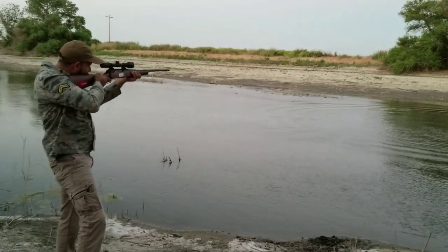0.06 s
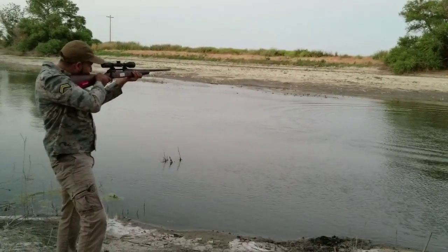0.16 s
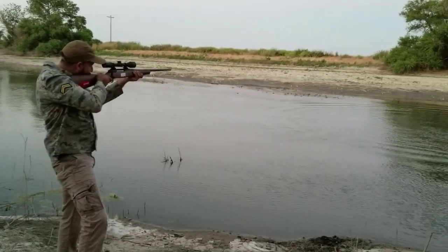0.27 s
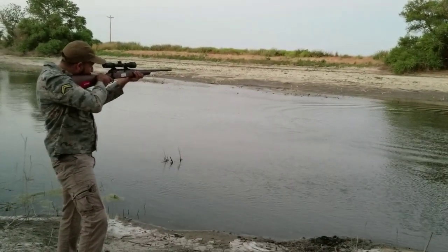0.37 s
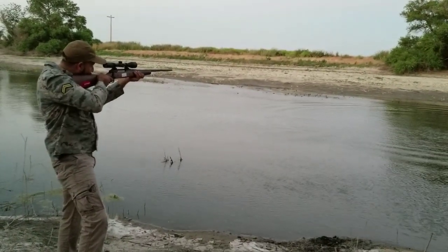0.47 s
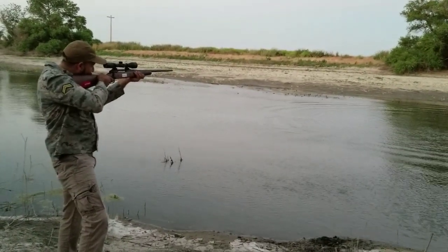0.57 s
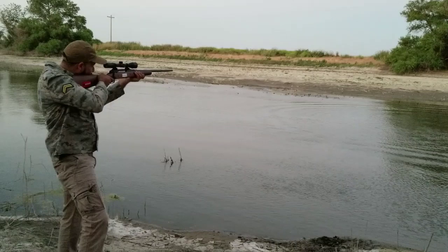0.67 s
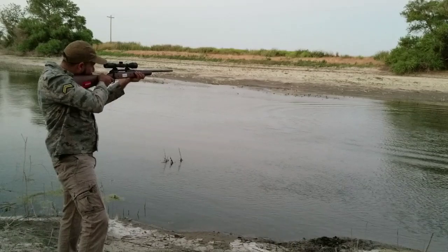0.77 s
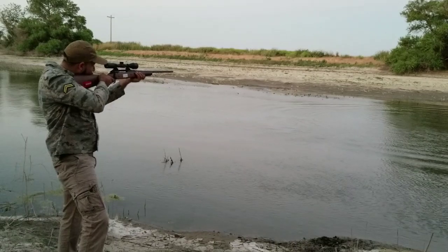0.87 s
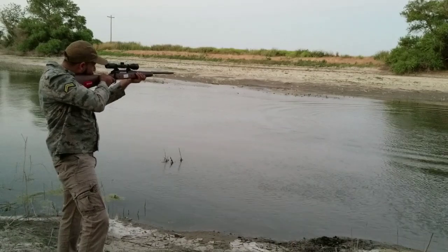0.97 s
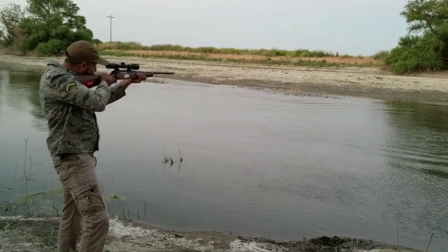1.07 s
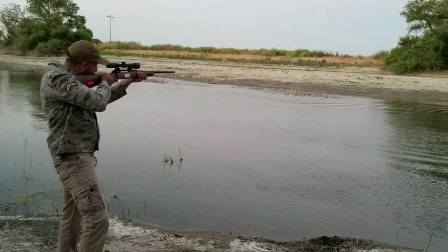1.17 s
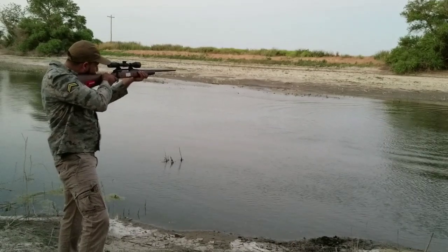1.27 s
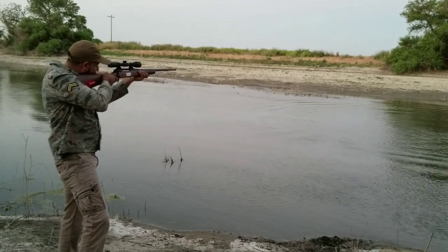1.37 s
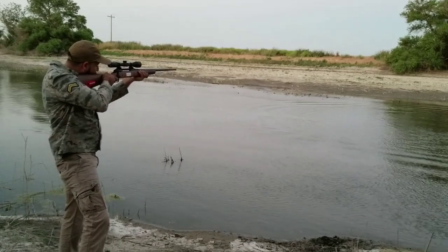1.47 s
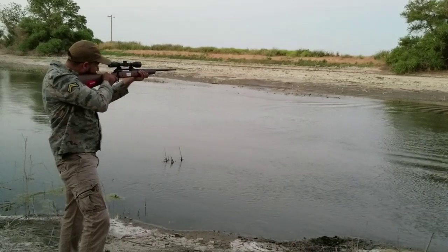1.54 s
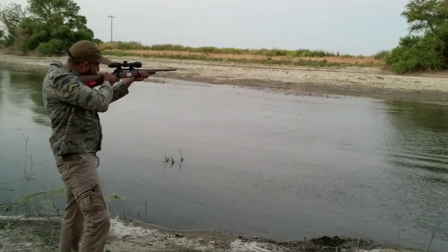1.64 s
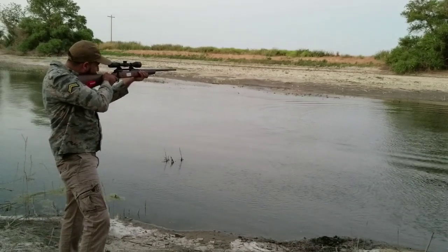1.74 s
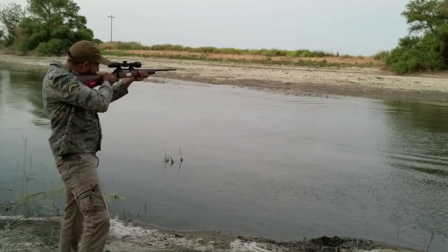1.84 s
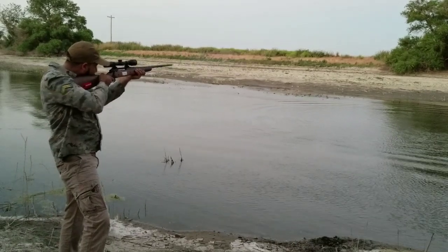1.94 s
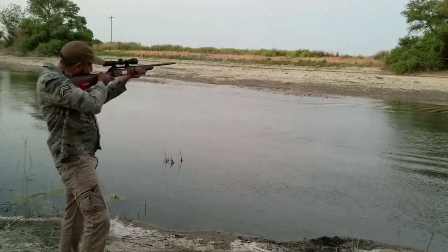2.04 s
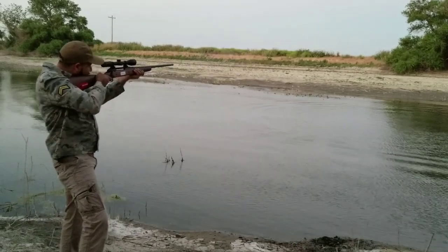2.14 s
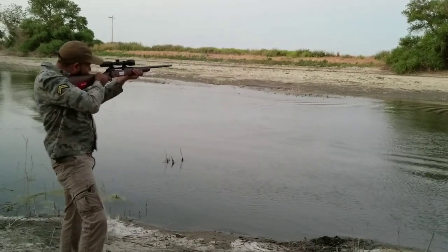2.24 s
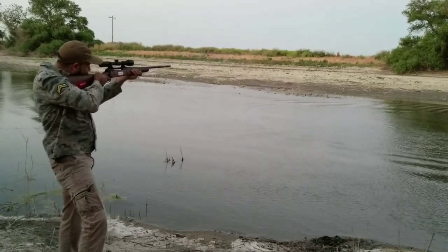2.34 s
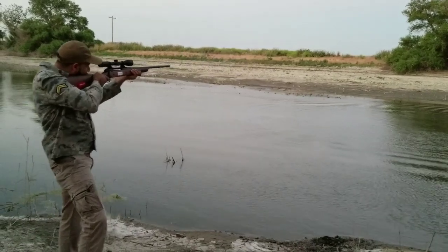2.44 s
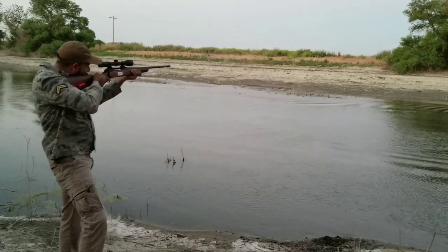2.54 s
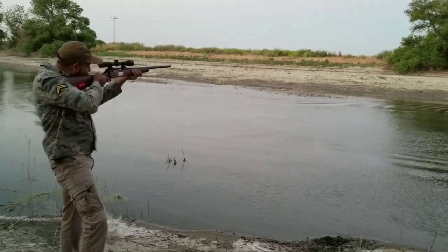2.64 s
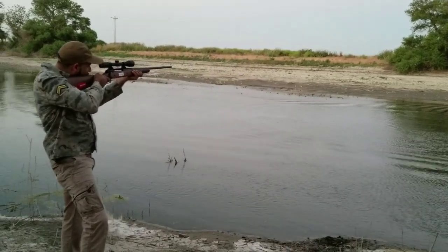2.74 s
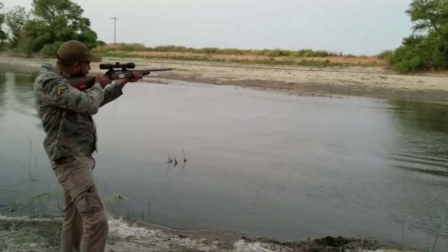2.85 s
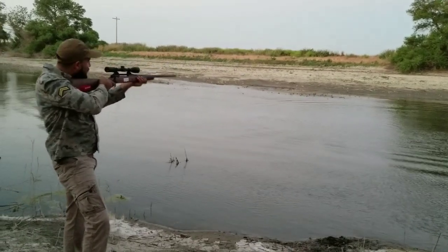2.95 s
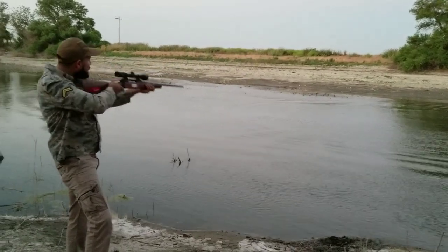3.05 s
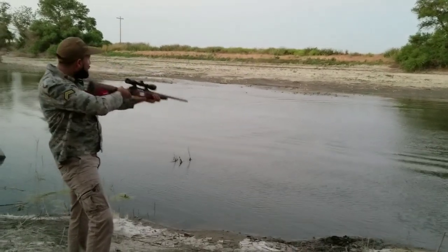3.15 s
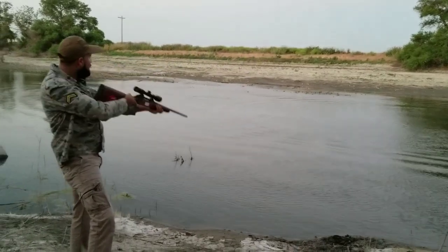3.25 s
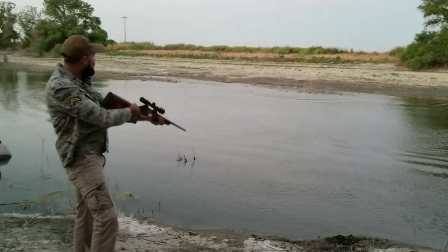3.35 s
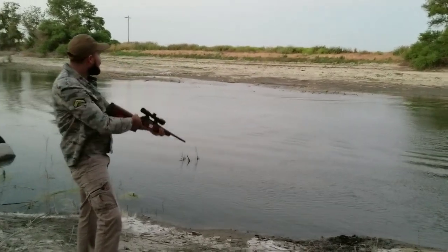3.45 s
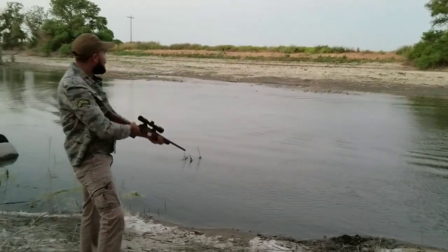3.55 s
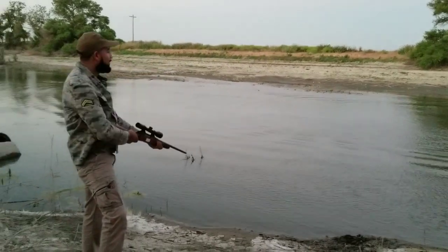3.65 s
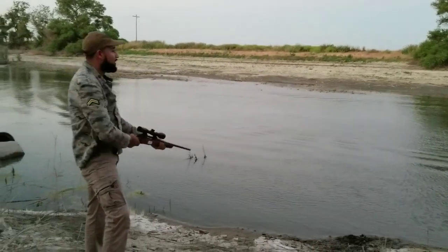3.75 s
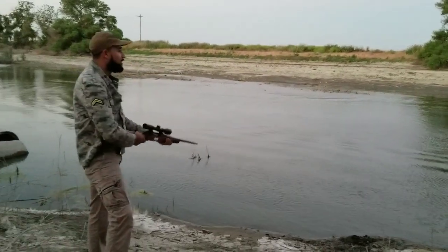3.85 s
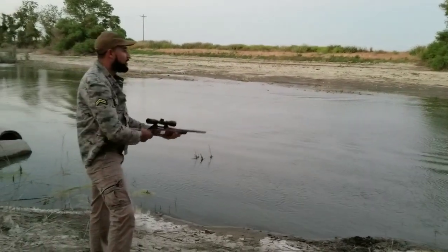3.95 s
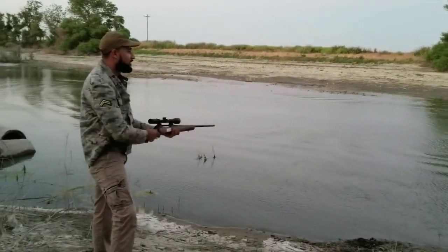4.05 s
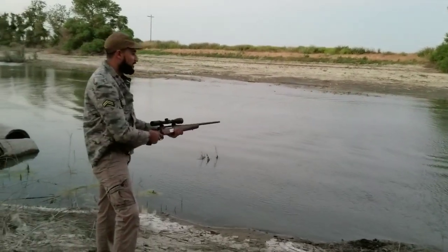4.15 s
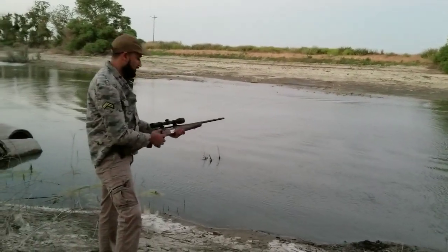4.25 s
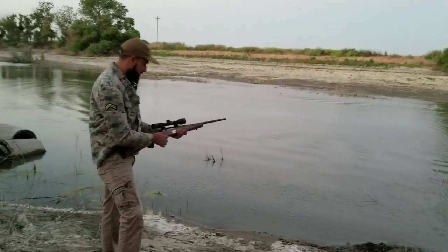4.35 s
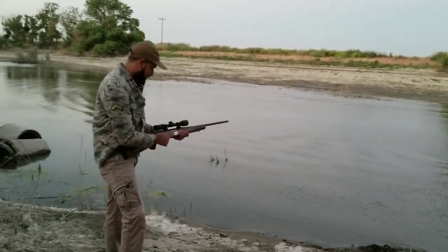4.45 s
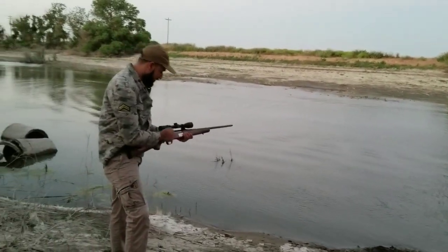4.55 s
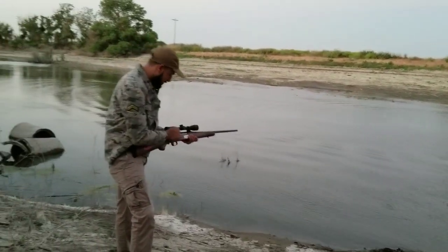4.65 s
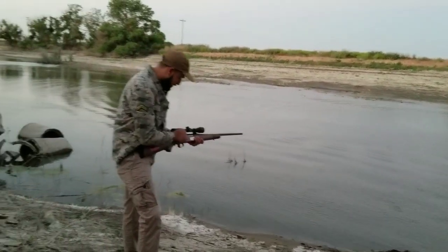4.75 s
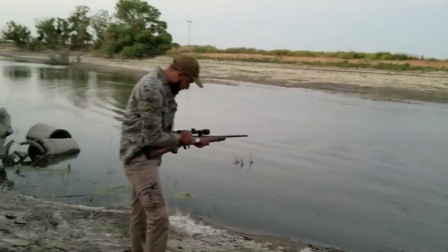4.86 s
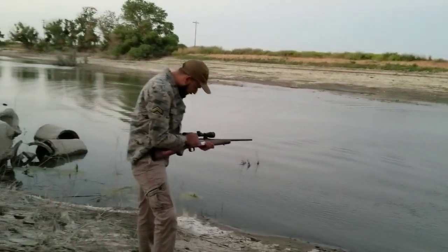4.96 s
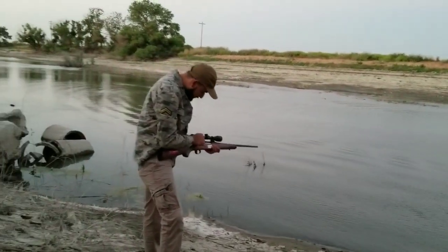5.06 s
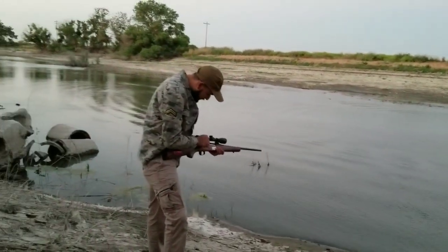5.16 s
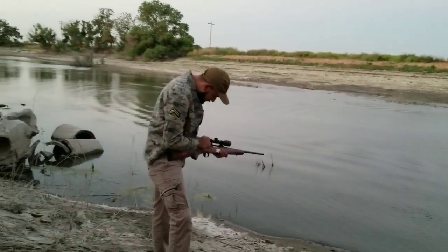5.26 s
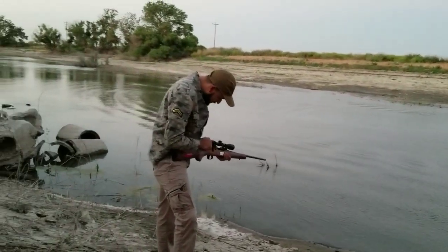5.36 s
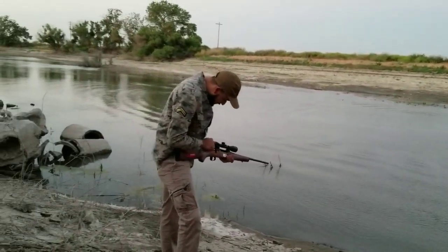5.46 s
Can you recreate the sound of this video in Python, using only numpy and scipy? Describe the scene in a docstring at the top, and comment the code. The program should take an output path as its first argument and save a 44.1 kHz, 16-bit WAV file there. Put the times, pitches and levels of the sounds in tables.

```python
"""A river bank with a camera of two microphone ports: rumble, a far roar, a faint hum and hiss, shaped noise and a tone.
Now and then a small bird chips far off, a short falling tone broken up by leaves and air.
At 2.3 s a small-bore rifle is fired across the river, a few metres away: a pressure pulse, then noise
scattered back by banks, reeds and far tree lines, duller the longer its path; the gain ducks and recovers.
From 4.6 s the bolt is worked: each contact rings the modes of receiver and stock."""
import sys
import numpy as np
from scipy import signal
from scipy.fft import rfft, irfft, next_fast_len
from scipy.io import wavfile
from scipy.ndimage import uniform_filter1d, map_coordinates

SR = 44100
rng = np.random.default_rng(int(sys.argv[2]) if len(sys.argv) > 2 else 0)


def volts_from_db(level):
    """Convert decibel levels to linear amplitude ratios."""
    exponent = np.asarray(level, float) / 20
    return 10 ** exponent


def output_pcm(signal):
    """Save a mono or channel-first signal as 16-bit PCM at the path in sys.argv[1].

    Samples are clipped to [-1, 1] before scaling.
    """
    pcm = np.clip(np.atleast_2d(signal).T, -1, 1) * 32767
    wavfile.write(sys.argv[1], SR, np.round(pcm).astype(np.int16))


N = 243323
T = np.arange(N) / SR  # s


def unit(x):
    """Scaled to rms 1."""
    return x / np.sqrt(np.mean(x ** 2) + 1e-20)


def along(points, hz):
    """Values at hz, from (f/Hz, value) points on a log axis."""
    f, value = np.transpose(points)
    return np.interp(np.log(hz + 1), np.log(f + 1), value)


def curves(rows):
    """One value per sample for each column after the time."""
    s, *columns = np.transpose(rows)
    return [np.interp(T, s, column) for column in columns]


def wobble(rate):
    """A smooth random curve, rate knots a second."""
    knots = rng.standard_normal(int(N * rate / SR) + 4)
    return map_coordinates(knots, [T * rate])


def filtered(x, response):
    """x times a complex response of frequency."""
    n = x.shape[-1]
    m = next_fast_len(n + 4096)
    spectrum = rfft(x, m) * response(np.fft.rfftfreq(m, 1 / SR))
    return irfft(spectrum, m)[..., :n]


# how alike the two microphone ports hear a sound: f/Hz, likeness (0 to 1)
PORT_LIKENESS = [(60, 0.89), (200, 0.99), (500, 0.97), (1000, 0.44), (3000, 0.33), (12000, .4)]


def ports(spectrum, lag_ms, n=N, alike=PORT_LIKENESS):
    """Noise of rms 1 at the two ports: partly shared, the left hearing it lag_ms later."""
    def mid_and_side(hz):
        turn = np.arccos(np.clip(along(alike, hz), 0, 1)) / 2
        return volts_from_db(along(spectrum, hz)) * np.array([np.cos(turn), np.sin(turn)])

    def lag(hz):
        return np.exp(-1j * np.pi * hz * np.array([[lag_ms], [-lag_ms]]) / 1000)

    mid, side = filtered(rng.standard_normal((2, n)), mid_and_side)
    pair = np.array([mid + side, mid - side])
    return unit(filtered(pair, lag))


# levels of the open air: t/s, rumble level/dB, far roar level/dB
AIR_LEVELS = [(0, -70, -73), (.4, -69.5, -71.5), (1.2, -67, -70), (1.9, -67, -71), (2.3, -68, -72.5),
              (3.4, -70.5, -71), (4, -67.5, -74.5), (4.7, -69.5, -68), (5.52, -65, -71.5)]
# spectrum of the far rumble: f/Hz, level/dB per Hz
RUMBLE_SPECTRUM = [(12, -33), (20, -13), (81, 5.5), (107, 2), (166, -5), (188, -19.5), (223, -34),
                   (250, -13), (320, -26), (550, -120)]
# spectrum of the far roar: f/Hz, level/dB per Hz
ROAR_SPECTRUM = [(120, -32.5), (200, -2.5), (224, -11), (315, 0), (432, -4), (779, -0.5), (1120, -9),
                 (3000, -17.5), (3900, -49), (6600, -120)]
# level of the hum before it wavers: t/s, level/dB
HUM_LEVELS = [(0, -76.5), (.6, -68), (.8, -82.5), (1.4, -75.5), (3, -90), (5.52, -67.5)]
HUM_HZ = 158
# spectrum of the hiss of each port: f/Hz, level/dB per Hz
HISS_SPECTRUM = [(880, 1.5), (1500, 2.5), (1950, 2), (2140, -4), (4860, -5.5), (5350, -6), (14000, -8.5),
                 (15000, -22.5)]
HISS_DB = -74


def background():
    """Far noise reaches both ports: lumpy rumble and a roar, with a wavering hum and each port's hiss."""
    rumble_db, roar_db = curves(AIR_LEVELS)
    hum_db, = curves(HUM_LEVELS)
    rumble = volts_from_db(rumble_db + 1.5 * wobble(2.6)) * ports(RUMBLE_SPECTRUM, lag_ms=-0.28)
    roar_flutter_db = 0.8 * wobble(27) + 0.7 * wobble(28)
    roar = volts_from_db(roar_db + roar_flutter_db) * ports(ROAR_SPECTRUM, lag_ms=-0.27)
    hum_turns = np.cumsum(HUM_HZ + 1.3 * wobble(9.1)) / SR
    hum = volts_from_db(hum_db + 2.5 * wobble(12)) * np.sin(2 * np.pi * hum_turns)
    hiss_db = HISS_DB + 0.33 * wobble(1.0)
    hiss = volts_from_db(hiss_db) * ports(HISS_SPECTRUM, lag_ms=0, alike=[(1000, 0.064)])
    return rumble + roar + hum + hiss


# chips of the far bird, level before the blur: t/s, length/s, level/dB
CHIRPS = [(1.102, 0.053, -73), (2.265, .035, -74), (4.286, 0.0396, -71.5), (5.185, 0.032, -79)]
CHIRP_START_HZ, CHIRP_END_HZ = 5770, 5270


def birds():
    """Short falling chips, far off, blurred by leaves and air differently at each port."""
    out = np.zeros(N)
    for s, length, db in CHIRPS:
        u = np.clip((T - s) / length, 0, 1)
        pitch_hz = CHIRP_END_HZ + (CHIRP_START_HZ - CHIRP_END_HZ) * (1 - u) ** 2
        out += volts_from_db(db) * np.sin(np.pi * u) * np.sin(2 * np.pi * np.cumsum(pitch_hz) / SR)
    return out * np.array([wobble(450), wobble(450)])


# bursts of the report, the direct blast first, then a low thump and echoes among them:
# t/s, level/dB, centre f/Hz, distance to -6 dB/octaves, decay/s
RETURNS = [(2.302, -3.5, 2394, .7, .003), (2.3051, 4, 1190, .5, 0.0033), (2.32, -18.5, 34.6, 0.43, 0.021),
           (2.319, 5.5, 570, 0.41, 0.0034), (2.331, -3, 600, 5.1, 0.0037), (2.34, -3.5, 493, .8, 0.002),
           (2.346, -1, 390, .7, 0.0036), (2.355, -3.5, 403, 0.15, .004), (2.414, -23, 2500, 0.59, 0.018),
           (2.47, -25, 3530, .46, .022), (2.542, -17.5, 1140, 1.65, .015),
           (2.556, -7.5, 4100, 0.52, 0.0044), (2.665, -22, 584.5, 1.03, 0.034),
           (2.765, -32.5, 1470, 1, .006), (2.822, -39.5, 2290, 0.34, 0.014),
           (2.82, -45.5, 300, 0.98, 0.013), (2.988, -40, 1180, 0.88, 0.029), (3.07, -37, 579, 1.38, 0.019),
           (3.152, -44, 1200, 0.88, 0.012), (3.228, -43.5, 1200, 0.91, 0.0085),
           (3.312, -42, 1005, .3, 0.004), (3.329, -44.5, 1190, .63, 0.0026),
           (3.343, -46, 1500, 0.84, 0.00083), (3.407, -52, 1916, 0.21, .018),
           (3.457, -51, 1953, 0.31, .005), (3.479, -41, 1200, 0.98, 0.0044),
           (3.493, -42.5, 881, 0.36, 0.0065), (3.512, -46, 2000, 0.58, 0.0029),
           (3.555, -52.5, 2144, 0.31, .013), (3.578, -44.5, 705, 1.17, 0.0089),
           (3.6, -53.5, 1009, 0.62, 0.0059), (3.705, -52.5, 535, .2, .016), (3.7, -56.5, 1983, .3, .015),
           (3.77, -56.5, 2010, .24, .035), (3.792, -49.5, 533, .12, 0.0082),
           (4.018, -60, 1512, .44, 0.0053)]
# side of the bursts, drifting with time: t/s, lag of the left port/ms
SIDES = [(2.3, 0.42), (2.7, 0.28), (3.1, -0.28), (3.6, -0.22), (4, 0.17)]
RISE_SHARE = 0.7  # rise time of a burst over its decay time


def returns():
    """Bursts of the direct blast, a low thump and echoes, each in its own band, the side drifting with time."""
    out = np.zeros((2, N))
    t = np.arange(-2048, 4096) / SR
    for s, db, hz, octaves, decay in RETURNS:
        band = [(hz * 2 ** (k * octaves), -6 * k * k) for k in range(-3, 4)]
        rise = np.exp(-(t / (RISE_SHARE * decay)) ** 2)
        swell = np.where(t < 0, rise, np.exp(-np.abs(t) / decay))
        lag_ms = np.interp(s, *np.transpose(SIDES))
        burst = swell * ports(band, lag_ms, len(t))
        start = round((s + t[0]) * SR)
        out[:, start:start + len(t)] += volts_from_db(db) * np.sqrt(np.mean(swell ** 2)) * unit(burst)
    return out


FIRED = 2.3015  # s
# centres of the bands that the air dulls one by one: f/Hz
AIR_BANDS = [2000, 2800, 4000, 5600, 8000, 11000, 14500]


def through_air(x, loss_db):
    """The air takes loss_db a second of travel at 10 kHz, less below, band by band."""
    travel = np.clip(T - FIRED, 0, None)
    out = 0
    for k, hz in enumerate(AIR_BANDS):
        share = list(zip(AIR_BANDS, np.arange(len(AIR_BANDS)) == k))
        band = filtered(x, lambda f: along(share, f))
        out = out + volts_from_db(-loss_db * (hz / 10000) ** 1.7 * travel) * band
    return out


def patchy(x, patchy_db):
    """Random patches of gain, some 20 ms by 500 Hz, make the scatter uneven."""
    z = signal.stft(x, nperseg=256)[2]
    field = rng.standard_normal(z.shape[1:])
    field = uniform_filter1d(field, size=3, axis=0)
    field = uniform_filter1d(field, size=7, axis=1)
    return signal.istft(z * volts_from_db(patchy_db * unit(field)), nperseg=256)[1][:, :N]


# the scattered report before air loss, as banks and tree lines answer in turn:
# t/s, level/dB, brightness/dB
SCATTER = [(2.302, -6, 1.5), (2.316, -6.5, -0.5), (2.322, -5.5, 0.5), (2.35, -5, -1.5), (2.375, -13, -3.5),
           (2.4, -21.5, -2), (2.44, -29.5, -1), (2.5, -26.5, 0), (2.57, -17.5, 4), (2.61, -29.5, 0),
           (2.66, -25.5, -0.5), (2.73, -34.5, 0.5), (2.8, -42.5, -2), (2.89, -50.5, -0.5), (3.05, -45.5, 1),
           (3.33, -55, 1.5), (3.37, -62, -4.5), (3.52, -54.5, 0.5), (3.63, -65, -4.5), (3.75, -61.5, -2),
           (3.9, -72, -5), (5.52, -82, -5.5)]
# spectrum of the low boom: f/Hz, level/dB per Hz
BOOM_SPECTRUM = [(20, -54.5), (60, -32.5), (110, -14), (180, -6), (250, -6), (330, -2.5), (450, -7.5),
                 (800, -7), (1000, -13), (1400, -47.5)]
# spectrum of the crack: f/Hz, level/dB per Hz
CRACK_SPECTRUM = [(600, -31.5), (900, 0.5), (1300, -2.5), (1650, -2), (2200, -2), (2800, -5), (5000, -27)]
# spectrum of the treble fizz: f/Hz, level/dB per Hz
FIZZ_SPECTRUM = [(2000, -24.5), (3800, -1.5), (5000, -2.5), (8300, -4.5), (9500, -11.5), (12500, -5.5),
                 (14500, -11)]
# colour of a long path over ground and water: f/Hz, level/dB
FAR_COLOUR = [(120, -10), (250, -9.5), (500, 6.5), (900, -7.5), (1250, 7), (2000, 3.5), (3500, 2.5)]
BOOM_DB, FIZZ_DB = -4, -3  # over the crack, at zero brightness as the shot is fired
BOOM_GAINS_DB_PER_S = 3  # the boom outlasts the crack
FIZZ_FOLLOWS = 1.1  # dB of fizz per dB of brightness


def shot():
    """The muzzle blast's pressure wave and distinct bursts over a patchy scatter of shaped noise."""
    crack_db, bright_db = curves(SCATTER)
    travel = np.clip(T - FIRED, 0, None)
    boom_db = crack_db + BOOM_DB - bright_db + BOOM_GAINS_DB_PER_S * travel
    fizz_db = crack_db + FIZZ_DB + FIZZ_FOLLOWS * bright_db
    lumps = wobble(60)
    boom = volts_from_db(boom_db + wobble(45)) * ports(BOOM_SPECTRUM, lag_ms=0.27)
    crack = volts_from_db(crack_db + 0.57 * lumps) * ports(CRACK_SPECTRUM, lag_ms=0.3)
    fizz = volts_from_db(fizz_db + 1.2 * lumps) * ports(FIZZ_SPECTRUM, lag_ms=0.27)
    near = patchy(boom + through_air(crack + fizz, loss_db=34.5), patchy_db=2.5)
    # the long-path colour takes over between 0.5 and 1.86 s of travel
    far = np.clip((travel - 0.5) / 1.36, 0, 1)
    scatter = (1 - far) * near + far * filtered(near, lambda hz: volts_from_db(along(FAR_COLOUR, hz)))
    # pressure wave of the muzzle blast, with its long suction
    u = travel / 0.004
    blast = volts_from_db(-14.0) * (T > FIRED) * (1 - u) * np.exp(-u)
    onset = np.clip(travel / 0.00044, 0, 1)
    return onset * scatter + returns() + blast


# contacts of the bolt: t/s, peak level/dB, favoured f/Hz, distance to -6 dB/octaves, snap level/dB
BOLT_CONTACTS = [(4.602, -45, 2477, .73, -65), (4.8526, -33.5, 1280, 0.064, -53.5),
                 (4.855, -38, 2665, 0.55, -68), (4.951, -49, 2500, 0.52, -61), (4.967, -30, 1400, 0.7, -42),
                 (4.9709, -30, 1914, 0.32, -40), (4.9732, -31, 1172, 0.17, -60),
                 (5.0078, -30, 2180, .054, -49.5), (5.362, -43.5, 1280, .3, -64),
                 (5.3705, -24, 1790, 0.31, -37.5), (5.3713, -27, 1400, 0.23, -44.5),
                 (5.374, -39, 604, 0.35, -64), (5.377, -42, 1860, .3, -47), (5.3829, -28.5, 2030, .11, -53),
                 (5.39, -44, 2030, .16, -62)]
# modes of receiver and stock, out of the hands: f/Hz, level/dB, t60/s
ACTION_MODES = [(495, -15, 0.061), (750, 3.5, 0.011), (1208, -11.5, 0.021), (1280, 5.5, 0.017),
                (1400, 0, 0.022), (1918, 0.5, .017), (2030, -1, 0.018), (2180, 1, 0.011),
                (2500, -1.5, 0.021), (3688, -14.5, 0.014), (4310, -7.5, 0.018), (6500, -7.5, 0.016),
                (7370, -2, 0.016), (8190, -6.5, 0.016)]
GRIP = 1.44  # the hands shorten the ring by this factor
# colour of the snap: f/Hz, level/dB
SNAP_COLOUR = [(300, -18), (2000, -2), (8500, 0), (10000, -1), (13000, -3)]


def bolt():
    """Each contact rings modes near its spot's favoured pitch; its snap rattles and rings the high ones."""
    dry = np.zeros(N + SR)
    t = np.arange(4096) / SR
    for s, db, favoured_hz, octaves, snap_db in BOLT_CONTACTS:
        ring, ping = 0, 0
        for hz, level, t60 in ACTION_MODES:
            decay_db = 60 * (t * GRIP / t60) ** 1.7
            mode = volts_from_db(level - decay_db) * np.sin(2 * np.pi * hz * t)
            ring = ring + volts_from_db(-6 * (np.log2(hz / favoured_hz) / octaves) ** 2) * mode
            ping = ping + (hz > 3000) * volts_from_db(rng.normal(0, 3)) * mode
        # the parts slide into contact, so the ring swells
        ring = (1 - np.exp(-t / 0.0014)) ** 2 * ring
        rattle = volts_from_db(-60 * t / 0.025) + volts_from_db(-10.5 - 60 * t / 0.2)
        snap = filtered(rattle * rng.standard_normal(len(t)), lambda f: volts_from_db(along(SNAP_COLOUR, f)))
        contact = volts_from_db(db) * ring / np.abs(ring).max() + volts_from_db(snap_db) * (snap + 0.8 * ping)
        dry[round(s * SR):][:len(t)] += contact
    dry = dry[:N]

    def placed(hz):
        # the left port hears it 0.05 ms sooner, the right 0.8 dB louder
        return volts_from_db([[-0.4], [0.4]]) * np.exp(1j * np.pi * hz * np.array([[0.05], [-0.05]]) / 1000)

    near = filtered(np.array([dry, dry]), placed)
    # ground and bank scatter a little back
    tail = ports([(300, -5), (2000, -7.5), (14000, -4)], lag_ms=0, n=4096) * volts_from_db(-60 * t / 0.32)
    tail = tail / np.linalg.norm(tail[0])
    return near + volts_from_db(-19) * signal.fftconvolve(dry[None], tail, axes=1)[:, :N]


def scene():
    """Everything at the two ports."""
    return background() + birds() + shot() + bolt()


def band_limit(x):
    """A steep low-pass at the top of the band."""
    return signal.sosfilt(signal.butter(12, 15670, fs=SR, output="sos"), x)


def record(dry):
    """Gain control ducks at a loud sound and climbs back steadily; peaks round off; the top is cut."""
    power = np.abs(uniform_filter1d(np.mean(dry ** 2, axis=0), size=256))
    level_db = 10 * np.log10(power + 1e-12)
    duck_db = np.clip(level_db + 24, 0, 11)
    climb_db = 7 * T  # recovers 7 dB a second
    x = dry * volts_from_db(climb_db - np.maximum.accumulate(duck_db + climb_db))
    x = x / (1 + np.abs(x / 0.98) ** 6) ** (1 / 6)
    top_hz = 14600
    mix = filtered(x, lambda hz: np.clip((top_hz - hz) / 100, 0.004, 1))
    return band_limit(mix)


dry = scene()
out = record(dry)
output_pcm(out)
```